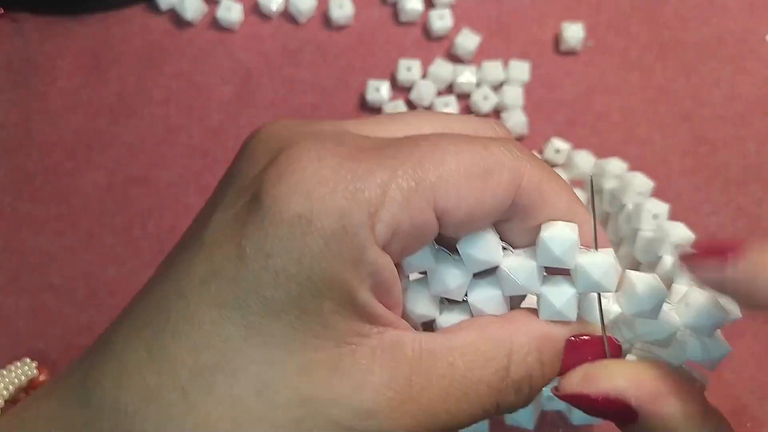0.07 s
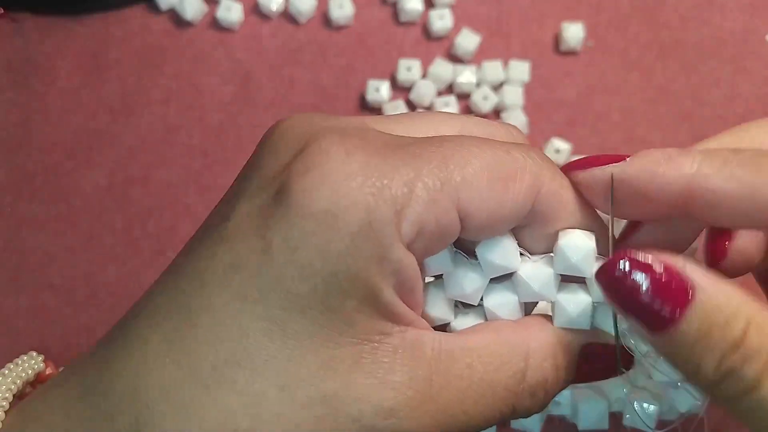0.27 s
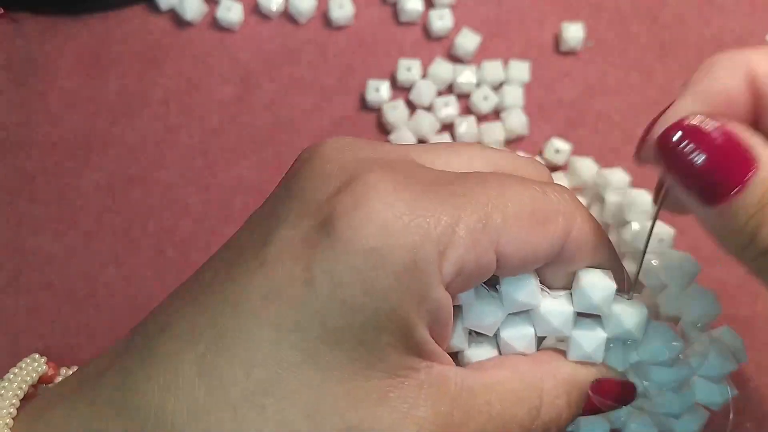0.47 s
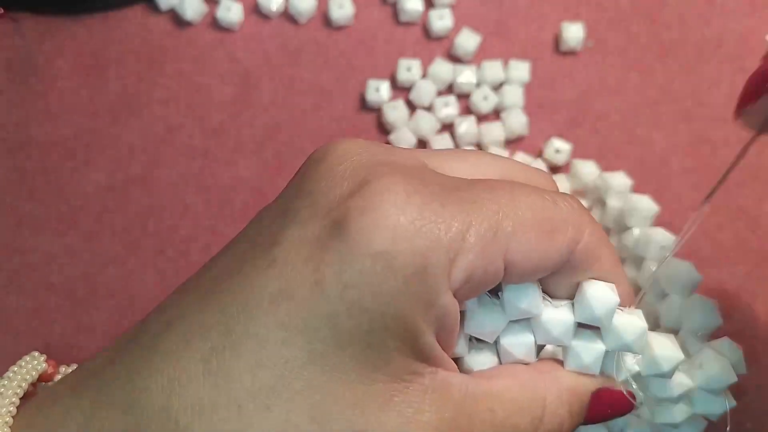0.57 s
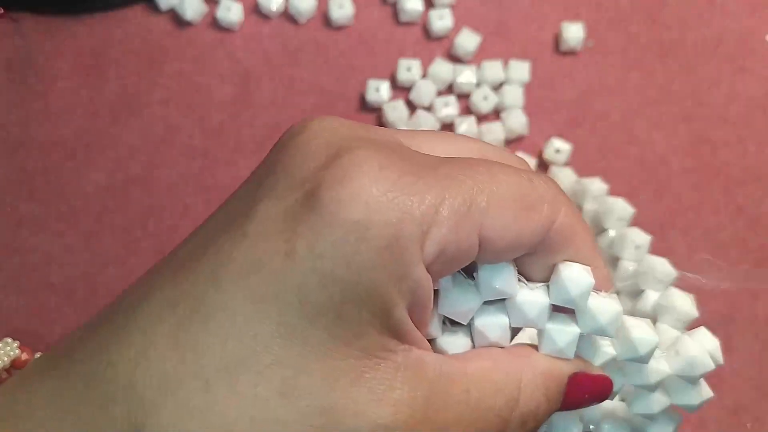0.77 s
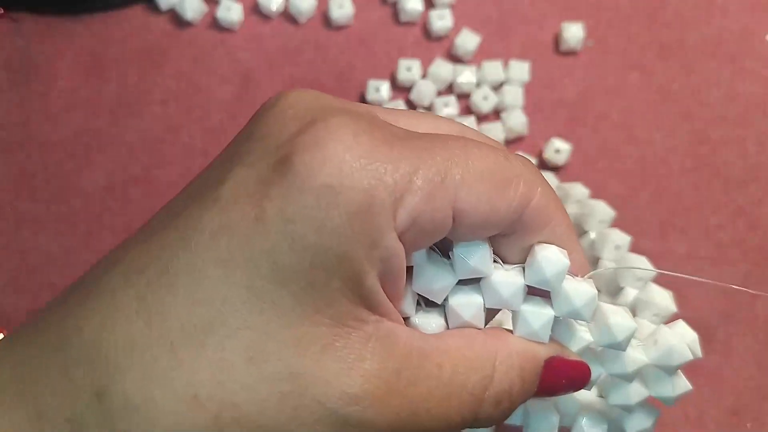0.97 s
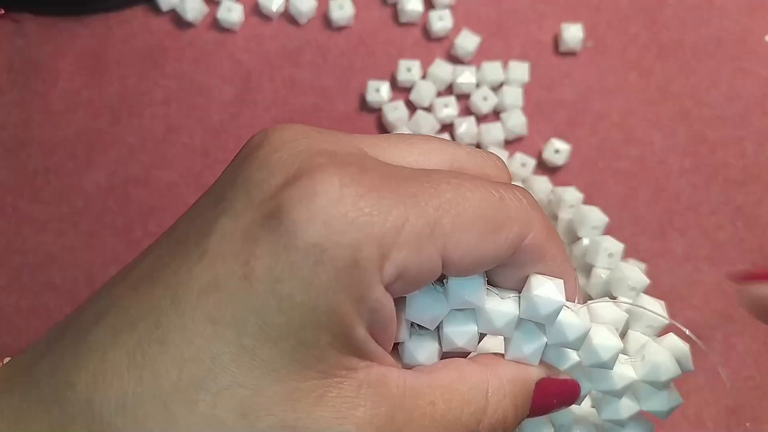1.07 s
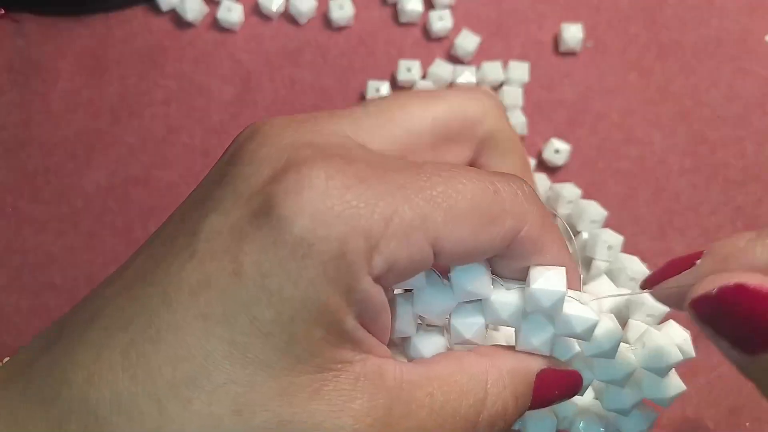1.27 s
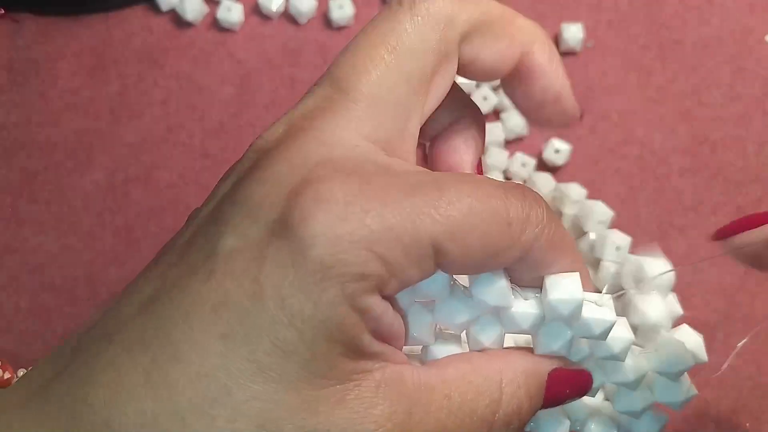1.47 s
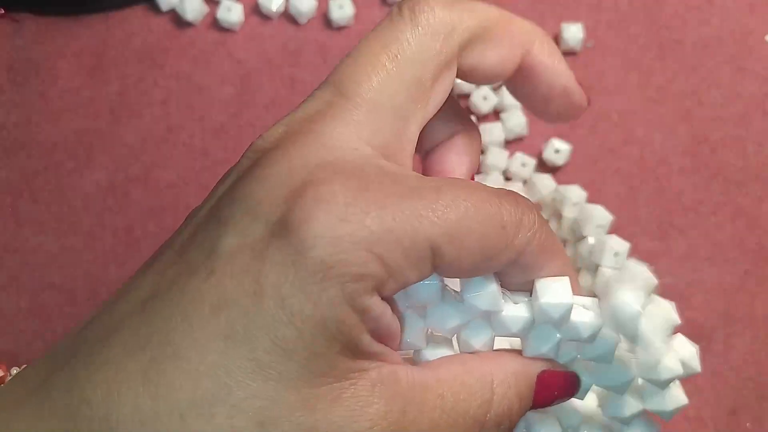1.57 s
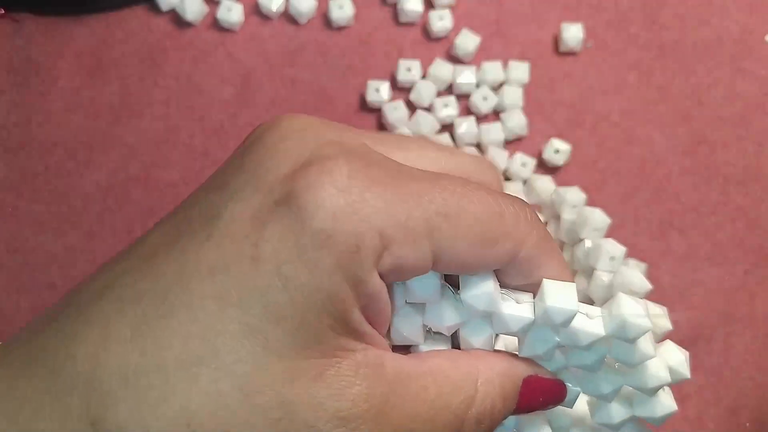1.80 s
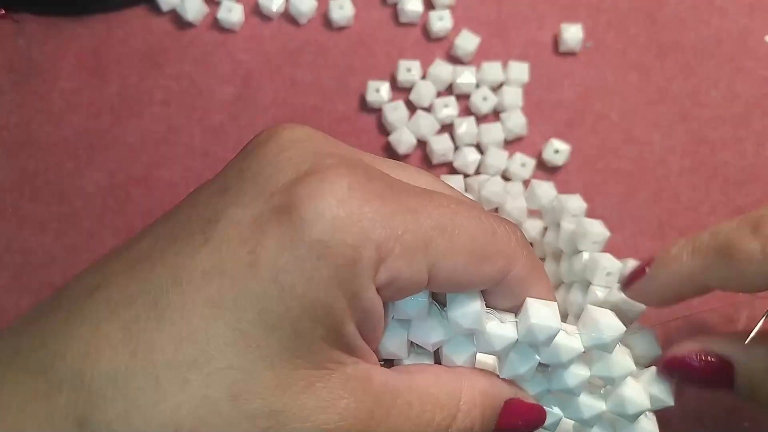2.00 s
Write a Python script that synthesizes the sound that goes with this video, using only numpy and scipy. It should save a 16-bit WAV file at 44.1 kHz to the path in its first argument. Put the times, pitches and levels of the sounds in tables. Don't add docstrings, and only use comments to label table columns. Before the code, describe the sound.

Small hard plastic beads knock lightly while a thread is drawn through, a brief cluster of clicks, then a louder rattling snap as it tightens, and faint settling ticks; close stereo microphones in a quiet room.

```python
import sys
import numpy as np
from scipy import signal
from scipy.fft import rfft, irfft
from scipy.io import wavfile

SR = 44100
rng = np.random.default_rng(int(sys.argv[2]) if len(sys.argv) > 2 else 0)


def inscribe(sig):
    pcm = np.round(np.clip(np.atleast_2d(sig).T, -1, 1) * 32767)
    wavfile.write(sys.argv[1], SR, pcm.astype(np.int16))


def voltage_ratio(decibels):
    exponent = np.asarray(decibels, float) / 20
    return 10 ** exponent


N = 89919

# (time
# [s], level [dB], left over right [dB], thud over click [dB])
BEAD_KNOCKS = [(0.1112, -59, 4, -11), (0.1394, -58.5, 1, 3), (0.2261, -59, 5, -15), (0.3239, -48.5, 6, -20),
               (0.4239, -54, 0, -22), (0.4914, -55.5, 4, -14), (0.5331, -54, -4, -4.5),
               (0.5451, -49, 11.5, -15), (0.5521, -53, 1, -10), (0.5718, -47, 0, -7.5),
               (0.6144, -43, 2, -21), (0.6194, -50.5, 3, -13.5), (0.6764, -40, 8, -18),
               (0.7912, -38.5, 4, -21), (0.8194, -33.5, 12, -22), (0.8227, -58, 11, -18),
               (0.8394, -42.5, 11, -12.5), (0.8449, -45, 9, -24), (0.8551, -48, 6, -16),
               (0.8646, -34, 5, -15), (0.8822, -23, 6, -19), (0.8938, -39, 10, -35), (0.8966, -25, 6, -14),
               (0.903, -27.5, 3, -17.5), (1.0038, -46.5, 8, -14.5), (1.0639, -52, 7, -18),
               (1.0667, -54.5, 10, -13), (1.078, -54, 9, -11),
               (1.377, -31, -1, -30), (1.3794, -21.5, 0, -25.5), (1.384, -46, -1, -17),
               (1.4122, -34.5, 0, -15), (1.464, -52.5, -2, -10), (1.5072, -50.5, 2, -6),
               (1.559, -31.5, 3.5, -19.5), (1.569, -42.5, 7, -20), (1.6084, -18.5, 0, -23.5),
               (1.6107, -24, 7, -27), (1.6364, -25, -9, -25), (1.639, -34, -2, -18),
               (1.6465, -30.5, -4, -19),
               (1.6645, -16.5, 1, -27),
    (1.668, -12.5, 4.5, -32),
    (1.6759, -14.5, 4, -36),
    (1.712, -6, -4, -20),
    (1.7176, -6.5, 3, -25.5),
    (1.7267, -12.5, 7, -30),
    (1.738, -29.5, -4, -12),
               (1.823, -53, 3, -16),
    (1.8738, -30.5, 8.5, -21),
    (1.9815, -36, 9, -15.5),
    (2.012, -47, 9, -19),
]
ECHO_SPAN_S, ECHO_DB, ECHO_LOSS_DB, ECHO_SPREAD_DB = 0.0017, -2, 16, 2.84
DIRECT_DB = -4


def knocks(echo_count=9):
    click, thud = np.zeros((2, 2, N + SR))
    for s, db, pan_db, thud_db in BEAD_KNOCKS:
        ear_shift = np.array([[0], [0.02]]) * rng.normal(size=echo_count + 1) ** 2
        lag = np.r_[0, rng.random(echo_count)] + ear_shift
        echo_db = ECHO_DB - ECHO_LOSS_DB * lag + ECHO_SPREAD_DB * rng.normal(size=lag.shape)
        size = voltage_ratio(echo_db) * rng.choice([-1, 1], lag.shape)
        size[:, 0] = voltage_ratio(DIRECT_DB)
        size /= np.sqrt(np.sum(size ** 2, axis=1, keepdims=True))
        for ear in (0, 1):
            at = ((s + ECHO_SPAN_S * lag[ear]) * SR).astype(int)
            np.add.at(click[ear], at, size[ear] * voltage_ratio(db) * sides(pan_db)[ear])
            np.add.at(thud[ear], at, size[0] * voltage_ratio(db + thud_db))
    return click[:, :N], thud[:, :N]


# (start [s], length [s], level [dB], left over right [dB], thud over click [dB])
BEAD_RATTLES = [(.891, 0.016, -46, 3, 4), (0.93, .012, -47.5, 5, 7), (1.4, .01, -50, 2, 1),
                (1.635, 0.02, -44, 1, 0), (1.659, 0.016, -38, -1, -2), (1.675, 0.0043, -28.5, -1, -5),
                (1.714, .003, -32, -2, -4), (1.714, 0.0067, -24, 6, -8), (1.716, 0.0091, -25.5, 1, -4),
                (1.607, 0.0058, -38, -2, -5), (1.73, .01, -49, 2, 11), (1.8, .006, -50, 1, 2),
                (1.504, .006, -64, 1, 2)]


def rattles():
    t = np.arange(N) / SR
    click, thud = 0, 0
    for s, length, db, pan_db, thud_db in BEAD_RATTLES:
        corners = [s, s + 0.0012, s + length, s + length + 0.0029]
        shape = np.interp(t, corners, [0.00023, 0.96, 0.45, 0.00045]) * voltage_ratio(db)
        click = click + shape * sides(pan_db)[:, None]
        thud = thud + shape * voltage_ratio(thud_db)
    hits = grains(per_s=2700, spread_db=3)
    return click * hits, thud * hits.mean(0)


# (start [s], length [s], level [dB])
THREAD_SLIDES = [
    (0.098, 0.048, -71),
    (0.277, 0.072, -70.5),
    (0.526, 0.1, -67.5),
    (0.683, .08, -57.5),
    (0.815, 0.09, -57.5),
    (1.393, 0.045, -63),
    (1.499, 0.052, -70),
    (1.581, 0.13, -52),
    (1.972, 0.083, -62.5),
]


def slides():
    t = np.arange(N) / SR
    shape = np.zeros(N)
    for s, length, db in THREAD_SLIDES:
        progress = np.clip((t - s) / length, 0, 1)
        shape += voltage_ratio(db) * np.sin(np.pi * progress) ** 2
    return shape * sides(2)[:, None] * grains(per_s=6000, spread_db=1.5)


# (frequency [Hz], level per Hz [dB])
BEAD_SPECTRUM = [(2500, -26), (4000, -10.5), (6000, -5.5), (8000, -3), (10000, -3), (12500, -7.5),
                 (15000, -16.5), (16500, -24)]


def bead_click(train):
    return signal.lfilter(minimum_phase(BEAD_SPECTRUM), 1, train)


# (frequency [Hz], level per Hz [dB])
WEAVE_SPECTRUM = [(500, -31), (900, -9), (1700, -13.5), (2600, -1.5), (3800, 0.5), (6000, -14.5)]


def weave_thud(train):
    return voltage_ratio(9.5) * signal.lfilter(minimum_phase(WEAVE_SPECTRUM), 1, train)


def room(x):
    t = np.arange(SR // 2) / SR
    fall = 0
    for t60_s, db in [(0.35, -16.5), (0.064, -11)]:
        unit_energy = np.sqrt(2 * np.log(1000) / t60_s / SR)
        fall = fall + voltage_ratio(db - 60 * t / t60_s) * unit_energy
    tail = rng.normal(size=(2, len(t))) * fall * np.minimum(t / 0.0026, 1)
    tail = signal.lfilter(*signal.butter(1, 11200, fs=SR), tail)
    return signal.fftconvolve(x[:1], tail)[:, :N]


# (frequency [Hz], bandwidth [Hz], lift [dB])
PORT_RESONANCES = [
    (10580, 1860, 8),
    (8520, 1400, 8),
]


def ports(x, lag_s):
    out = []
    for v, (hz, width_hz, lift_db) in zip(x, PORT_RESONANCES):
        r = np.exp(-np.pi * width_hz / SR)
        zeros = [(1 - r * r) / 2, 0, (r * r - 1) / 2]
        poles = [1, -2 * r * np.cos(2 * np.pi * hz / SR), r * r]
        peak = signal.lfilter(zeros, poles, v)
        out.append((v + (voltage_ratio(lift_db) - 1) * peak) / voltage_ratio(lift_db / 2))
    right = signal.lfilter(*signal.butter(2, 10100, fs=SR), out[1])
    delay = np.exp(-2j * np.pi * np.arange(N // 2 + 1) * SR / N * lag_s)
    return np.array([out[0], irfft(rfft(right) * delay, N)])


# (frequency [Hz], level per Hz [dB])
HISS_SPECTRUM = [(70, -17.5), (160, -2), (400, -4.5), (1000, -12.5), (3500, -21), (9500, -20),
                 (13000, -27.5), (16400, -34)]


def microphone_hiss():
    return voltage_ratio(-68 + 3) * sides(-1)[:, None] * noise(HISS_SPECTRUM)


# (frequency [Hz], level per Hz [dB])
RUMBLE_SPECTRUM = [(3, -0.5), (16, -2), (30, -10), (60, -15), (110, -23), (250, -26.5), (500, -39.5)]


def rumble():
    return voltage_ratio(-56.5 + 2) * sides(-3.5)[:, None] * noise(RUMBLE_SPECTRUM)


def noise(points):
    return rms_one(irfft(rfft(rng.normal(size=(2, N))) * spectrum_gain(points, N), N))


def grains(per_s, spread_db, count=40):
    size_db = spread_db * np.minimum(rng.exponential(1, N), 4)
    size = voltage_ratio(size_db) * rng.choice([-1, 1], N)
    hits = size * (rng.random(N) < per_s / SR)
    paths = rng.normal(size=(2, count)) * (rng.random((2, count)) < 0.15) * 0.53
    paths[:, 0] = 1
    return np.array([rms_one(signal.lfilter(path, 1, hits)) for path in paths])


def rms_one(x):
    return x / np.sqrt(np.mean(x ** 2) + 1e-20)


def sides(pan_db):
    return voltage_ratio(np.array([pan_db / 2, -pan_db / 2]))


def spectrum_gain(points, size):
    hz = np.maximum(np.arange(size // 2 + 1) * SR / size, 1)
    f, db = np.transpose(points)
    return voltage_ratio(np.interp(np.log(hz), np.log(f), db, left=-70, right=-70))


def minimum_phase(points, size=512):
    db = np.transpose(points)[1]
    extended = [(1, db[0] - 24), *points, (SR / 2, db[-1] - 14.5)]
    cepstrum = irfft(np.log(spectrum_gain(extended, size)))
    cepstrum[1:size // 2] *= 2
    cepstrum[size // 2 + 1:] = 0
    pulse = irfft(np.exp(rfft(cepstrum)))[:size // 2]
    return pulse / np.sqrt(np.sum(pulse ** 2))


def scene():
    knock, knock_thud = knocks()
    rattle, rattle_thud = rattles()
    knock_gain = voltage_ratio(9)
    bright = bead_click(knock_gain * knock + rattle + slides())
    low = weave_thud(knock_gain * knock_thud + voltage_ratio(-15.5) * rattle_thud)
    heard = ports(bright + room(bright + low), lag_s=0.000239) + ports(low, lag_s=0.00003)
    return heard + microphone_hiss() + rumble()


def top_cut(x):
    return signal.sosfilt(signal.butter(12, 16470, fs=SR, output="sos"), x)


def record(dry):
    low_pass = signal.cheby2(12, 50, 16700, fs=SR, output="sos")
    mix = signal.sosfilt(low_pass, dry)
    return top_cut(mix)


dry = scene()
out = record(dry)
inscribe(out)
```